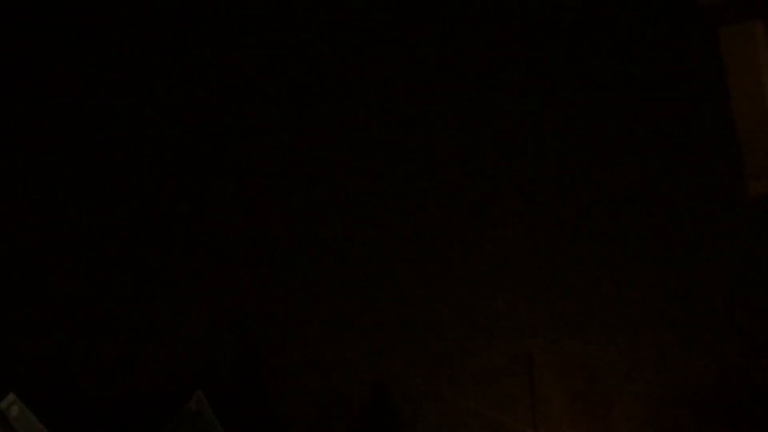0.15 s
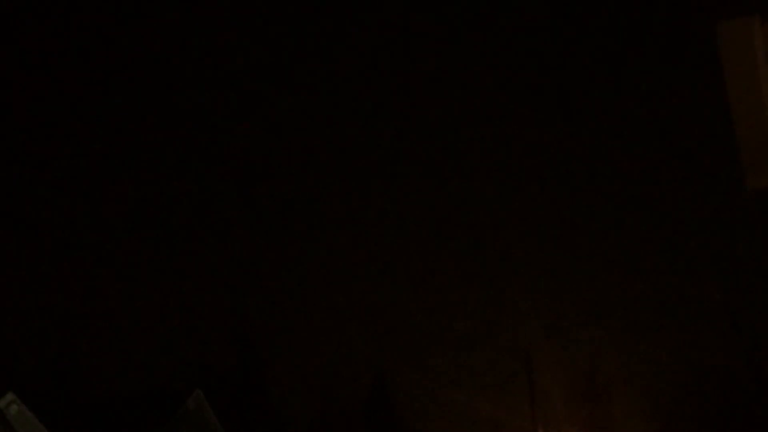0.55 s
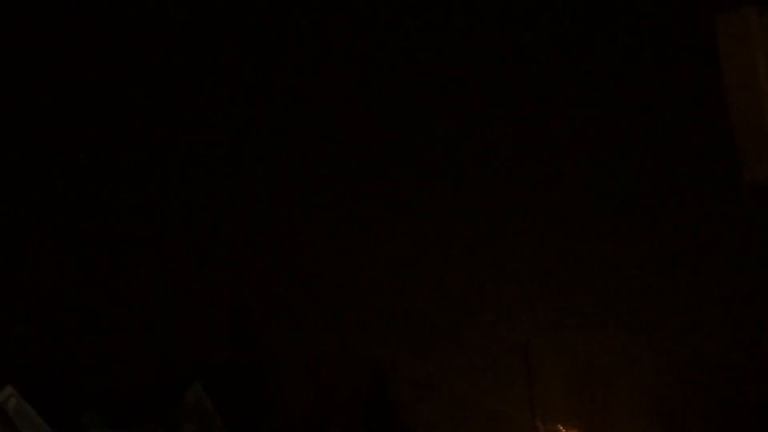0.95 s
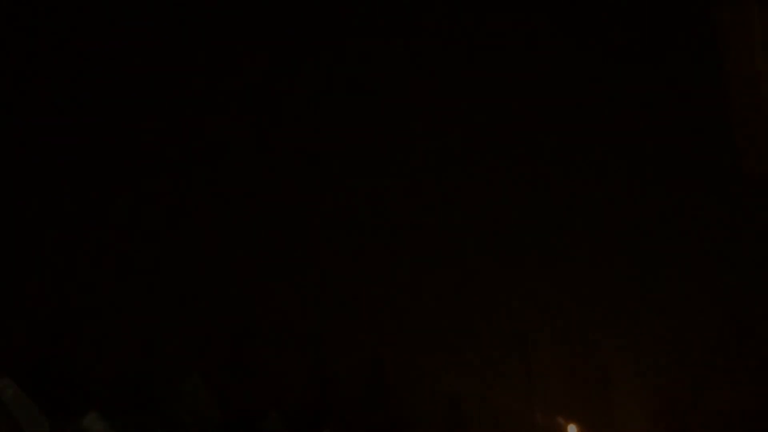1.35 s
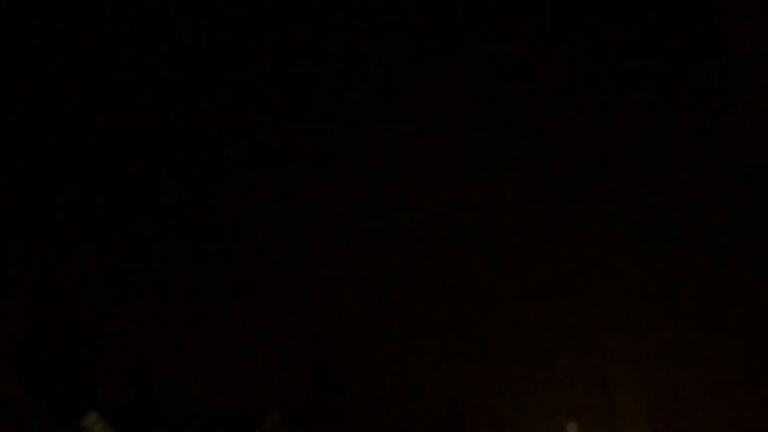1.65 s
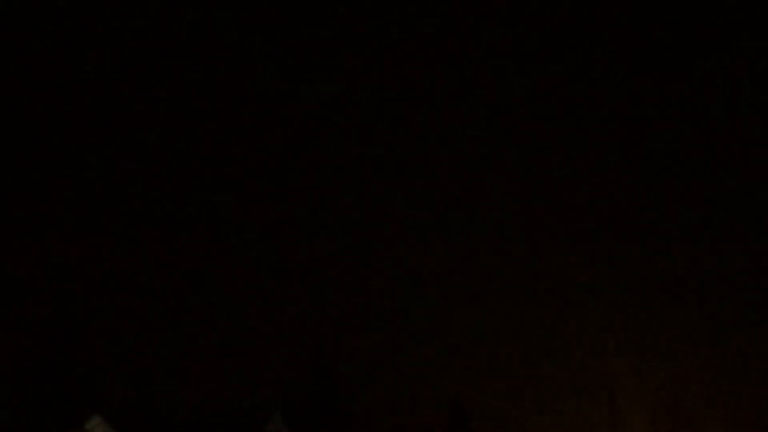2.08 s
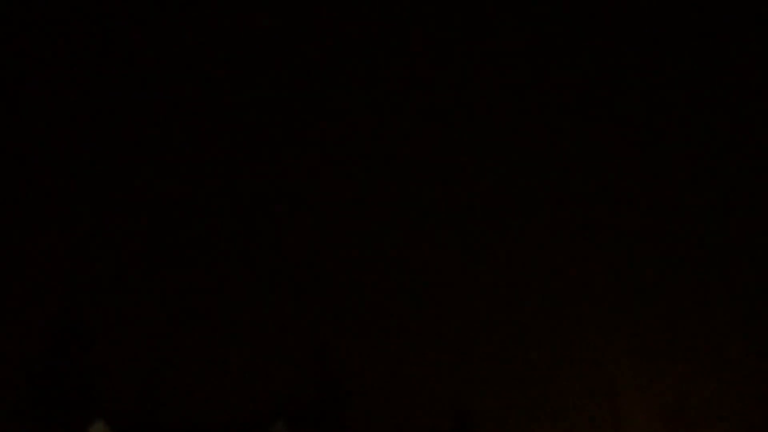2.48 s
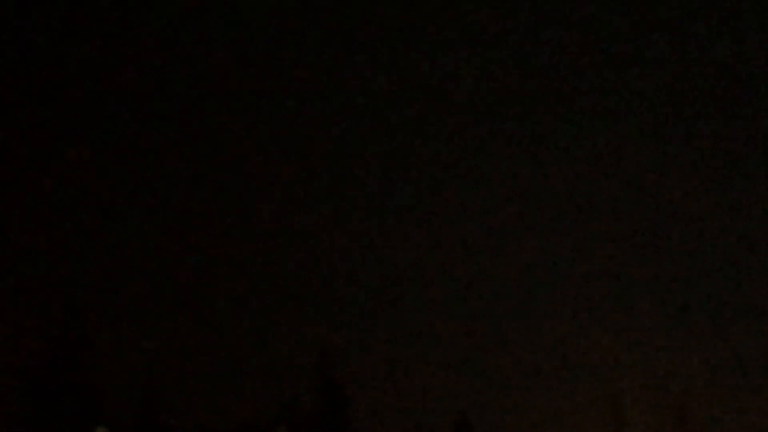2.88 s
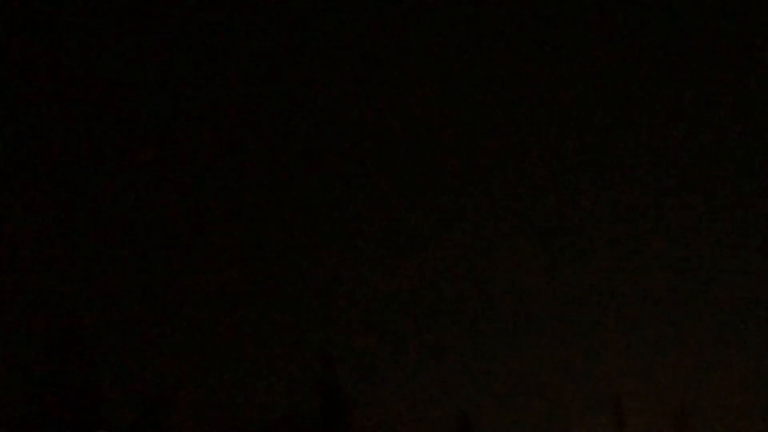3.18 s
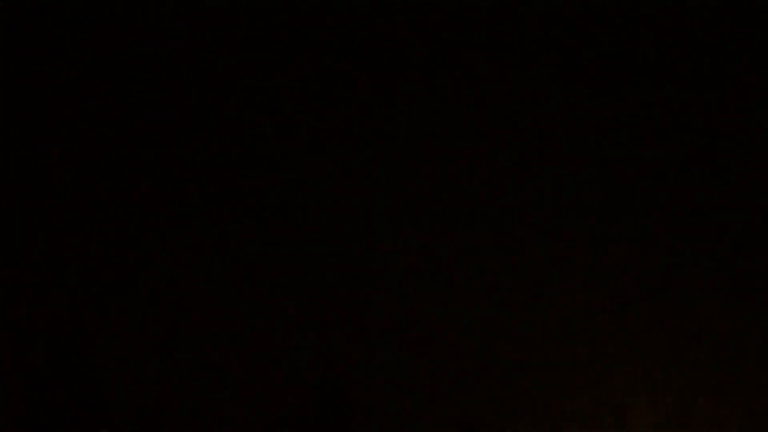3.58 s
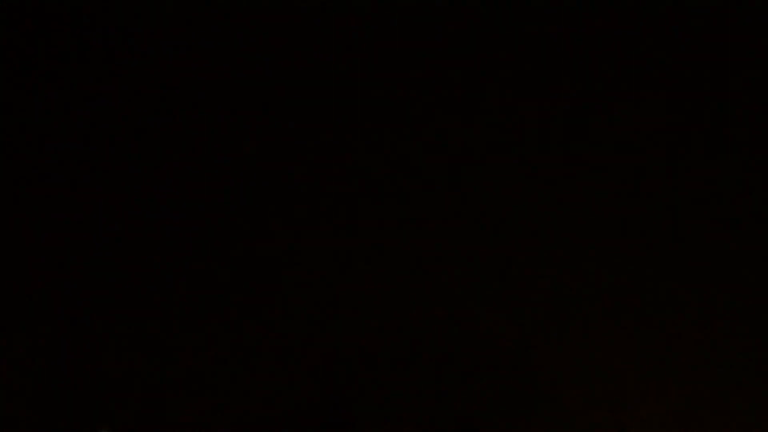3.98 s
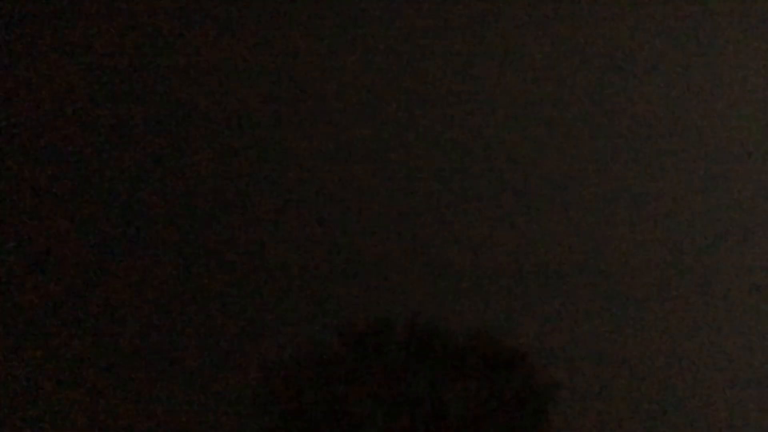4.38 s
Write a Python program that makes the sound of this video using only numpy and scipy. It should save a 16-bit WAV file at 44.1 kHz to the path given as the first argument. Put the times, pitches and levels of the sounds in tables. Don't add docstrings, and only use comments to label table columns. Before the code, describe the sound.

Close raindrops tick over a soft wash of rain; low thunder mutters, then cracks, booms and rumbles on in several uneven claps.

```python
import sys
import numpy as np
from scipy import signal
from scipy.fft import rfft, irfft
from scipy.io import wavfile
from scipy.ndimage import uniform_filter1d, minimum_filter1d

SR = 44100
rng = np.random.default_rng(int(sys.argv[2]) if len(sys.argv) > 2 else 0)


def bounce(signal):
    frames = np.transpose(np.atleast_2d(signal))
    limited = np.clip(frames, -1, 1)
    pcm = np.round(limited * 32767).astype(np.int16)
    wavfile.write(sys.argv[1], SR, pcm)


def natural_amplitude(level_db):
    exponent = np.asarray(level_db, float) / 20
    return 10 ** exponent


N = 200073


def evened(x):
    return x / np.sqrt(np.mean(x ** 2) + 1e-20)


def read(points, hz):
    f, value = np.transpose(points)
    return np.interp(np.log(hz + 1), np.log(f + 1), value)


def add(mix, s, sound):
    part = mix[:, max(round(s * SR), 0):][:, :sound.shape[1]]
    part += sound[:, :part.shape[1]]


def panned(db):
    return natural_amplitude(np.array([[db / 2], [-db / 2]]))


def train(per_s, spread_db):
    size_db = spread_db * np.minimum(rng.exponential(1, N), 4)
    size = natural_amplitude(size_db) * rng.choice([-1., 1.], N)
    return size * (rng.random(N) < per_s / SR)


def tick(hz, cycles, phase=0):
    turns = np.arange(400) * hz / SR
    return np.sin(2 * np.pi * (turns + phase)) * np.exp(-turns / cycles) * np.minimum(turns / 0.38, 1)


# (t/s, level/dB, treble left by the air/dB)
FAR_ROLL = [(0.0, -75, 8), (0.4, -66, -4), (0.75, -58, -4), (0.92, -54.5, -4.5), (0.976, -42.5, -15.5),
            (1.13, -46.5, -14), (1.29, -52, -11.5), (1.585, -54.5, -8), (1.64, -30, -16), (1.9, -33, -12),
            (2.14, -36, -11.5), (2.3, -33.5, -16.5), (2.47, -35, -14), (3.3, -36, -15.5),
            (3.39, -39, -14.5), (3.8, -38.5, -18.5), (4.2, -39, -19), (4.537, -43, -17)]
# (start t/s, level/dB, length/s, deep waves/dB, treble left by the air/dB)
NEAR_CLAPS = [(1.595, -31.5, 0.037, -4, -17), (1.66, -23.5, 0.067, -1.5, -17.5),
              (1.748, -36, 0.039, -12, -17), (1.826, -32.5, 0.048, -10, -37), (2.312, -35.5, 0.036, 5, -20),
              (2.489, -21.5, 0.029, -2, -20.5), (2.525, -24, .055, -10, -22),
              (2.581, -19, 0.066, -7, -25.5), (2.76, -25, 0.024, -14, -27),
              (2.794, -20.5, 0.021, -2, -18.5), (2.848, -21.5, 0.097, -8, -24.5),
              (2.907, -25.5, 0.055, -11, -17), (2.986, -22, 0.05, -5.5, -27),
              (3.502, -31.5, 0.058, -4.5, -40), (3.607, -25.5, 0.018, -4, -25),
              (3.862, -34.5, 0.055, 5, -20), (3.928, -47.5, 0.017, -6, -3.5),
              (4.117, -39.5, .075, -2.5, -19), (4.48, -54, 0.024, -5, -26)]
ROLL_LEAN_DB, CLAP_LEAN_DB = 1, 3.4


def swell_of(share, roll_db, rise_s, fall_db, deep):
    t = np.arange(0, N + 64, 64) / SR
    s, level_db, treble_db = np.transpose(FAR_ROLL)
    far = natural_amplitude(np.interp(t, s, level_db + share * treble_db) + roll_db)
    near = np.zeros(len(t))
    for start, db, length, deep_db, treble_db in NEAR_CLAPS:
        rising = np.clip((t - start) / rise_s, 0, 1)
        faded_db = fall_db * np.maximum(t - start - length, 0)
        near += (rising * natural_amplitude(db + deep * deep_db + share * treble_db - faded_db)) ** 2
    both = np.sqrt((panned(ROLL_LEAN_DB) * far) ** 2 + panned(CLAP_LEAN_DB) ** 2 * near)
    return np.array([np.interp(np.arange(N) / SR, t, side) for side in both])


# (low edge f/Hz, high edge f/Hz, slope/dB per octave, waves/1/s, left-right likeness 0-1,
# left-right/dB, trim/dB, bunching on the booms 0-1)
SHOCK_SIZES = [
    (115.5, 323, -0.5, 1500, 0.88, -2, -3, 0),
    (23.5, 118, 3, 700, 1, -5, -2.5, 0.07),
    (400, 870, -9.5, 3000, 0.85, -0.5, -1, 0.23),
    (833, 1554, -7, 4000, 0.8, -1.2, -0.08, 0.11),
    (1620, 5300, -12, 4600, 0.57, -1, -8, 0),
]
# (share of the treble loss, level in the roll/dB, rise of a clap/s, fall of a clap/dB per s)
SIZE_SWELLS = [(0, 0.5, 0.01, 175), (0, -6, 0.01, 205), (.62, 2.04, 0.0054, 114), (1.01, 0, .006, 83),
               (1.03, -2, 0.0058, 89)]


def rolls(loud):
    hz, out = np.fft.rfftfreq(N, 1 / SR) + 1, np.zeros((2, N))
    strengths = [swell_of(*row, deep=k == 1) for k, row in enumerate(SIZE_SWELLS)]
    loud_power = uniform_filter1d((loud ** 2).mean(0), 330)
    steep = 0.33 + loud_power / (strengths[0] ** 2).mean(0)
    for size, strength in zip(SHOCK_SIZES, strengths):
        low, high, slope_db, per_s, same, lean_db, trim_db, bunching = size
        direct, scattered = train(per_s, 1.59), train(per_s, 1.3)
        mid, side = np.sqrt((1 + same) / 2) * direct, np.sqrt((1 - same) / 2) * scattered
        slope = natural_amplitude(slope_db * np.log2(hz / low))
        band = slope / np.sqrt((1 + (low / hz) ** 8) * (1 + (hz / high) ** 8))
        waves = irfft(rfft([mid + side, mid - side]) * band, N)
        swell = uniform_filter1d((waves ** 2).mean(0), round(6 * SR / low)) + 1e-12
        waves = evened(waves / swell ** .3)
        out += panned(lean_db) * waves * strength * natural_amplitude(trim_db) * abs(steep) ** bunching
    return out


# (t/s, level/dB, f/Hz)
SIDE_ON_BOOMS = [(1.644, -23, 444), (1.68, -18.5, 300), (1.701, -17, 311), (1.728, -18.5, 246),
                 (1.757, -21.5, 296), (1.814, -23.5, 450), (1.878, -22, 196), (1.897, -24.5, 166),
                 (1.943, -25, 227), (2.333, -17, 190), (2.363, -20, 195), (2.506, -13.5, 173),
                 (2.532, -14, 202), (2.566, -20, 182), (2.635, -9.5, 285), (2.824, -18.5, 258),
                 (2.851, -11.5, 139.7), (2.931, -15.5, 262), (2.959, -11.5, 191), (3.007, -16, 173),
                 (3.058, -22.5, 230), (3.3, -27, 259), (3.523, -25, 228), (3.837, -31.5, 405),
                 (3.883, -31, 380), (3.943, -23, 180), (4.065, -35, 180), (4.126, -26, 180),
                 (4.15, -23, 181), (4.176, -27.5, 179)]
# (t/s, level/dB, f/Hz)
LONG_THUDS = [(1.672, -16.5, 66), (1.723, -14.5, 134), (1.834, -21.5, 138), (2.334, -33, 91),
              (2.346, -18.5, 50.3), (2.529, -13, 73), (2.637, -34, 38), (2.81, -24, 92),
              (3.038, -17.5, 111), (3.618, -32, 60), (3.642, -18, 134), (3.682, -26.5, 64.5),
              (3.889, -13.5, 107), (3.936, -27, 95), (3.961, -25, 131), (4.059, -30.5, 109),
              (4.132, -23.5, 93.5)]
# (t/s, level/dB, f/Hz)
FAR_MUTTERS = [
    (0.689, -49, 413),
    (0.976, -36, 256),
    (0.998, -52, 76),
    (1.013, -37, 243),
    (1.06, -42.5, 80),
    (1.085, -40, 520),
    (1.118, -44, 228),
    (1.211, -48, 75.4),
    (1.226, -42.5, 400),
    (1.303, -45.5, 76.5),
]
SUDDEN_STARTS = [
    0,
    1.602,
    2.331,
    2.497,
    2.802,
    3.516,
    3.609,
    3.872,
    4.119,
]
BOOM_CYCLES, MUTTER_CYCLES = 3.547, 4.43
THUD_CYCLES, THUD_GROWTH = 2.05, 0.47


def booms():
    out = np.zeros((2, N))
    rows = [(*row, BOOM_CYCLES) for row in SIDE_ON_BOOMS]
    rows += [(*row, THUD_CYCLES * (row[2] / 100) ** THUD_GROWTH) for row in LONG_THUDS]
    rows += [(*row, MUTTER_CYCLES) for row in FAR_MUTTERS]
    for (s, db, hz, cycles), (phase, glide, lag) in zip(rows, rng.random((len(rows), 3))):
        u = np.arange(0, 1, hz / (2.32 * cycles * SR))
        shape = np.sin(np.pi * u ** 0.6) ** 2
        turns = 2.356 * cycles * u * (1 + 0.1 * (glide - .5) * (u - 1)) + phase
        start = s - 0.3553 * len(u) / SR
        front = max(first for first in SUDDEN_STARTS if first <= s)
        shape *= np.clip((start + np.arange(len(u)) / SR - front) / .003 + 1, 0, 1)
        skew = np.array([[.03], [-.03]]) * (lag + 0.61)
        gains = natural_amplitude(db - 3.5) * panned(np.clip(1.4 * np.log2(hz / 110), -2, 2.2))
        add(out, start, gains * shape * np.sin(2 * np.pi * (turns + skew)))
    return out


# (t/s, level/dB, length/ms, first swing +1 push or -1 pull, crack level/dB)
CLAP_FRONTS = [(1.599, -22.5, 8.4, 1, -43), (1.663, -30, 9.9, -1, -46), (1.675, -31, 5.3, 1, -29),
               (2.3284, -28, 5, 1, -44), (2.498, -29, 7.8, -1, -35), (2.5036, -34, 3.6, 1, -26),
               (2.528, -40, 3, 1, -36), (2.631, -37, 1.7, 1, -26), (2.8022, -15, 6.9, 1, -25.5),
               (2.851, -38, 7, -1, -22.5), (2.932, -18, 4, 1, -21), (3.518, -22, 5.4, -1, -53),
               (3.6071, -15.5, 9, -1, -48), (3.871, -9.5, 9.4, -1, -48), (4.121, -32, 7.2, 1, -53)]
CRACK_HZ, LOUD_CRACK_HZ = 895, 1110


def fronts():
    out = np.zeros((2, N))
    for s, db, ms, swing, crack_db in CLAP_FRONTS:
        hz = np.interp(crack_db, (-36, -30), (CRACK_HZ, LOUD_CRACK_HZ))
        u = np.arange(0, 1.5, 1000 / (ms * SR))
        wave = swing * np.sin(2 * np.pi * u) * np.sin(np.pi * (u / 1.5) ** 1.8) ** .8
        crack = tick(hz, 1.8) + natural_amplitude(-14) * tick(2.4 * hz, 1.8)
        add(out, s, natural_amplitude(db) * panned(.7) * wave)
        add(out, s + 0.00071, natural_amplitude(crack_db) * panned(1.6) * crack * np.hanning(800)[400:])
    return out


SNAP_HZ, SNAP_S = 2300, .004
BOOM_SNAP_DB, FRONT_SNAP_DB = -31, -16


def snaps():
    out, t = np.zeros((2, N)), np.arange(900) / SR
    rows = [(s - .003, db + BOOM_SNAP_DB) for s, db, hz in SIDE_ON_BOOMS]
    rows += [(row[0], row[-1] + FRONT_SNAP_DB) for row in CLAP_FRONTS]
    colour = tick(SNAP_HZ, 0.49)
    for (s, db), grit in zip(rows, rng.standard_normal((len(rows), 2, len(t)))):
        burst = (grit[:1] + 0.2 * grit) * np.exp(-t / SNAP_S) * np.minimum(t / 0.0015, 1)
        coloured = signal.oaconvolve(burst, colour[None]) / np.linalg.norm(colour)
        add(out, s, natural_amplitude(db) * panned(1.8) * coloured)
    return out


# (t/s, level/dB, f/Hz, left-right/dB)
LOUD_DROPS = [(0.043, -35.5, 9000, 0), (0.306, -42, 7000, 0), (0.4938, -32.5, 10400, -1),
              (0.565, -36, 12200, 0), (0.8203, -38, 6400, 2), (0.9074, -37, 11700, 1),
              (0.9256, -36, 5560, 1), (1.2836, -40, 2840, 5), (1.5917, -38.5, 4800, 3),
              (1.6446, -40, 11700, 0), (1.798, -37, 6900, 1), (1.8656, -38, 6500, 0),
              (1.9643, -37, 7900, -1), (2.0172, -34, 6500, 3), (2.2632, -39, 11000, -1),
              (2.3325, -37, 6700, 0), (3.0639, -38, 11000, -2), (3.0799, -38, 7200, 1),
              (3.2054, -34, 8140, -1), (3.3324, -37, 13000, 0), (3.445, -36, 9600, 3),
              (3.5447, -36, 12400, -1), (3.5572, -37, 7450, -1), (3.896, -36, 6100, 0),
              (4.082, -37, 9200, 1), (4.1287, -35.5, 11000, -1), (4.2079, -38, 7300, 3),
              (4.3512, -38, 11000, 0), (4.3603, -34, 7850, -1), (4.4931, -32, 12300, 3)]
# (t/s, level/dB, f/Hz, left-right/dB)
WATER_PLINKS = [(1.1714, -40, 2950, 4), (1.178, -43, 2900, 3), (1.1872, -39, 3160, 3),
                (1.193, -39, 6400, 0), (1.585, -40, 4760, 0), (2.58, -37, 2970, 2), (2.646, -34, 7000, 0),
                (2.658, -36.5, 6360, -3), (2.669, -38.5, 4970, 0), (3.241, -35, 6340, -1),
                (3.262, -37, 6600, -3), (3.266, -41, 6400, 0), (3.2695, -41, 6400, 0)]
CLICK_CYCLES, DROP_CYCLES, PLINK_CYCLES = .55, 2.2, 8
DROP_CLICK_DB, PLINK_CLICK_DB = 15, 7
STRAYS, STRAY_DB, STRAY_SPREAD_DB = 44, -43.5, 5
STRAY_LOW_HZ, STRAY_HIGH_HZ, STRAY_PAN_DB = 3500, 14000, 5
SPLASH_S = .0026


def near_drops():
    out, t = np.zeros((2, N)), np.arange(600) / SR
    when, size, colour, side = rng.random((STRAYS, 4)).T
    stray_s = (np.arange(STRAYS) + when) / STRAYS * N / SR
    stray_hz = STRAY_LOW_HZ * (STRAY_HIGH_HZ / STRAY_LOW_HZ) ** colour ** .5
    strays = zip(stray_s, STRAY_DB - STRAY_SPREAD_DB * size, stray_hz, STRAY_PAN_DB * (side - .4))
    rows = [(*row, DROP_CYCLES, DROP_CLICK_DB) for row in [*LOUD_DROPS, *strays]]
    rows += [(*row, PLINK_CYCLES, PLINK_CLICK_DB) for row in WATER_PLINKS]
    grits = rng.standard_normal((len(rows), 2, 600))
    for (s, db, hz, pan, cycles, click_db), grit in zip(rows, grits):
        ring, click = tick(hz, cycles), tick(hz, CLICK_CYCLES)
        splash = grit * np.exp(-t / SPLASH_S)
        spray = signal.oaconvolve(splash, ring[None])[:, :600] / np.linalg.norm(ring)
        spray[:, :400] += ring * natural_amplitude(2.5) + click * natural_amplitude(click_db)
        add(out, s - .0004, natural_amplitude(db - 11.0) * panned(pan) * spray)
    return out


PATTER_DB, PATTER_PER_S, PATTER_SPLASH_DB = -63.5, 300, -13


def patter():
    out, t = np.zeros((2, N)), np.arange(500) / SR
    for hz, pan in zip(np.geomspace(3500, 14500, 10), rng.uniform(-4, 4, 10)):
        spray = natural_amplitude(PATTER_SPLASH_DB) * rng.standard_normal(len(t)) * np.exp(-t / SPLASH_S)
        splash = spray + (t == 0)
        drops, click = train(PATTER_PER_S / 10, 5), tick(hz, .45)[:60]
        out += panned(pan) * signal.oaconvolve(drops, np.convolve(splash, click))[:N]
    return natural_amplitude(PATTER_DB) * evened(out)


# (f/Hz, level/dB per Hz)
WASH_SPECTRUM = [(18, -10), (30, 4), (81, 0.5), (141, -8), (264, -7.5), (326, -9), (551, -3.5), (1700, -9),
                 (4150, -10), (11500, -16), (15800, -24)]
# (f/Hz, likeness 0-1)
WASH_LIKENESS = [(60, 0.99), (180, 0.87), (550, 0.89), (1650, 0.8), (4970, 0.58), (15000, 0.13)]
# (f/Hz, left-right/dB)
WASH_LEAN = [(60, -2), (240, 0), (950, -1), (3770, 0.0), (15000, -1.5)]
WASH_DB = -51.5


def wash():
    frames, hz = N // 64 + 9, np.fft.rfftfreq(256, 1 / SR)
    a, b, c, d, patches = rng.standard_normal((frames, 129, 5)).T
    patches = evened(uniform_filter1d(uniform_filter1d(patches, 8, 0), 30, 1))
    flicker = evened(uniform_filter1d(rng.standard_normal(frames), 40))
    same = read(WASH_LIKENESS, hz)[:, None]
    left, other = a + 1j * b, c + 1j * d
    z = np.array([left, same * left + np.sqrt(1 - same ** 2) * other])
    z *= natural_amplitude(1.42 * patches + 0.25 * flicker * np.clip(hz / 4000, 0, 1)[:, None])
    flat = signal.istft(z, nperseg=256, noverlap=192)[1][:, :N]
    fine = np.fft.rfftfreq(N, 1 / SR)
    lean_db = np.array([[.5], [-.5]]) * read(WASH_LEAN, fine)
    colour = natural_amplitude(read(WASH_SPECTRUM, fine) + lean_db)
    return natural_amplitude(WASH_DB) * evened(irfft(rfft(flat) * colour, N))


def scene():
    loud = booms() + fronts()
    return rolls(loud) + loud + snaps() + near_drops() + patter() + wash()


def top_cut(x):
    return signal.sosfilt(signal.butter(12, 16070, fs=SR, output="sos"), x)


def record(dry):
    ceiling, edge_hz = .212, 15800
    room = ceiling / np.maximum(abs(dry).max(0), ceiling)
    gain = uniform_filter1d(minimum_filter1d(room, 301), 151)
    low_pass = signal.firwin(511, edge_hz, window=("kaiser", 9), fs=SR)
    held = signal.oaconvolve(dry * gain, low_pass[None], "same")
    return top_cut(held)


dry = scene()
out = record(dry)
bounce(out)
```